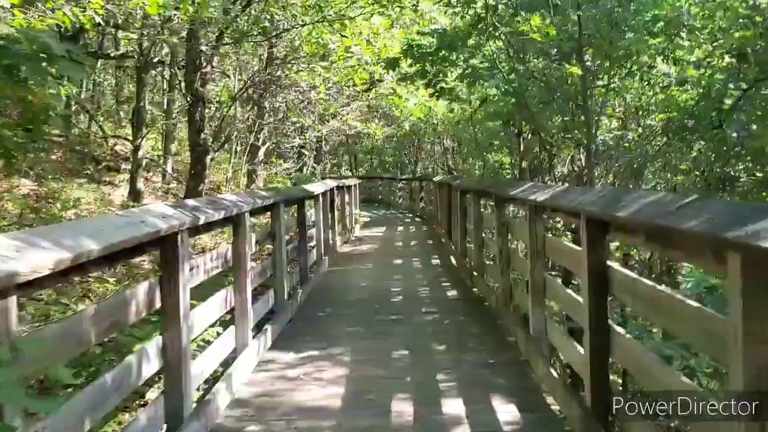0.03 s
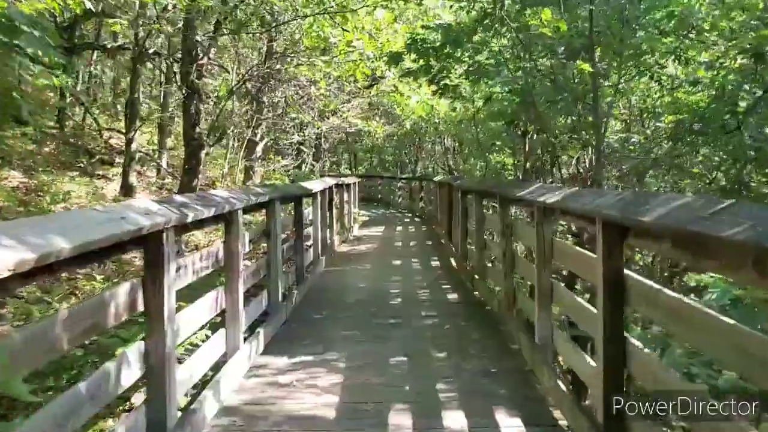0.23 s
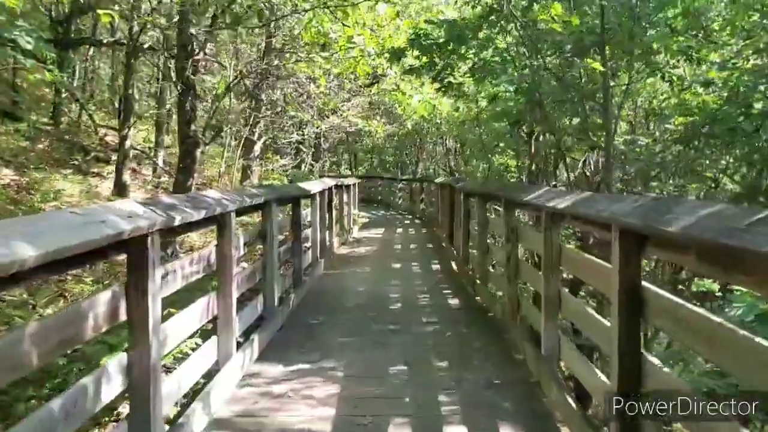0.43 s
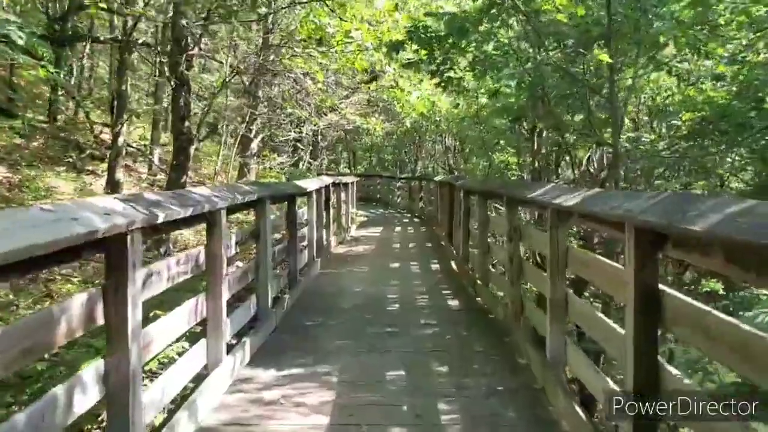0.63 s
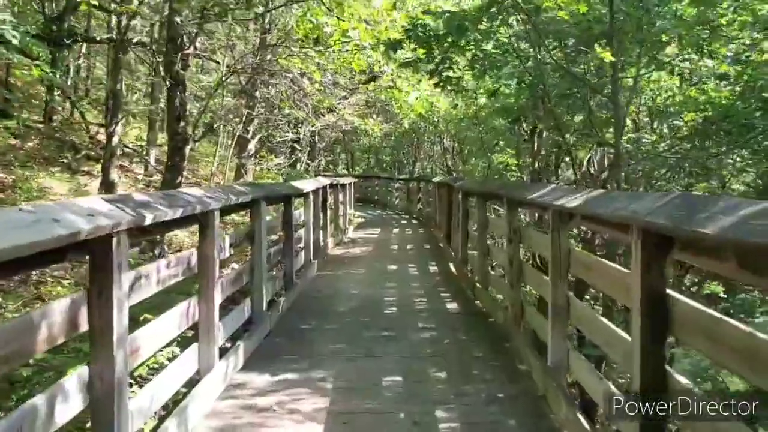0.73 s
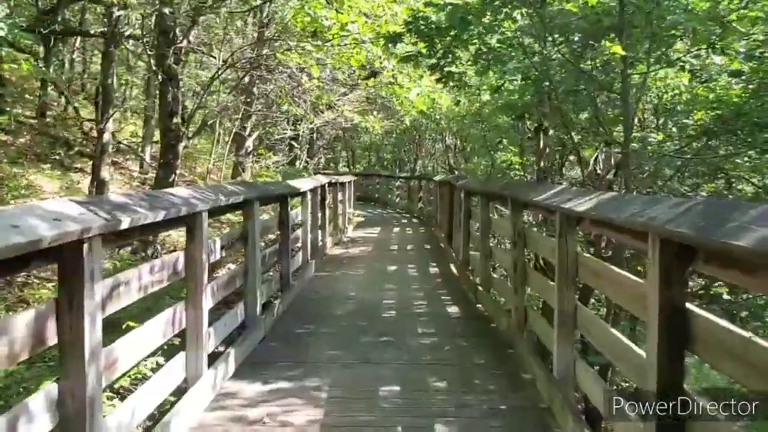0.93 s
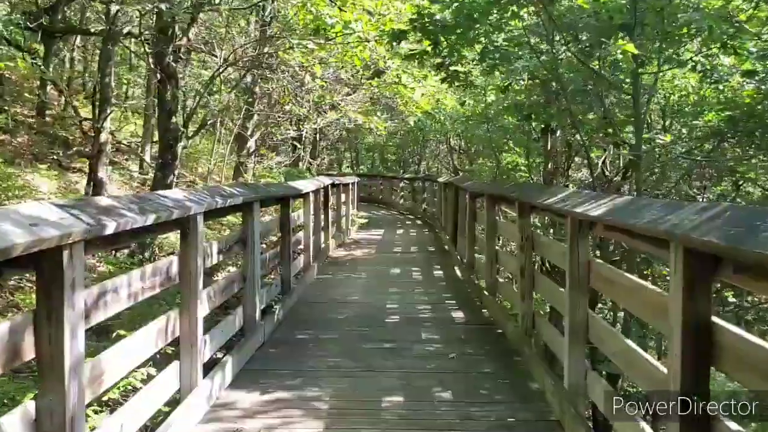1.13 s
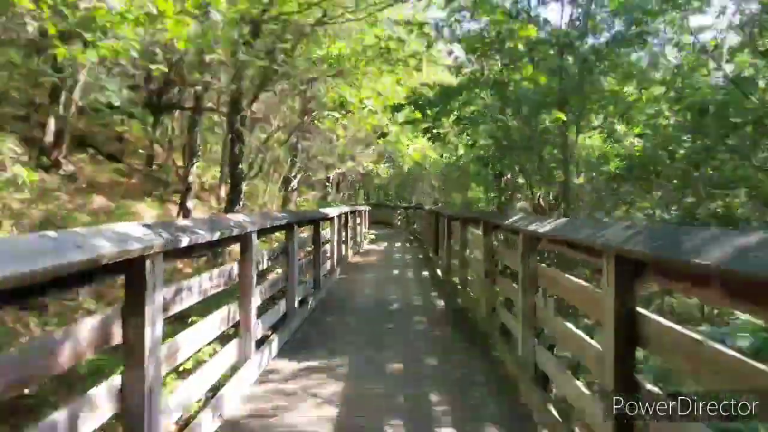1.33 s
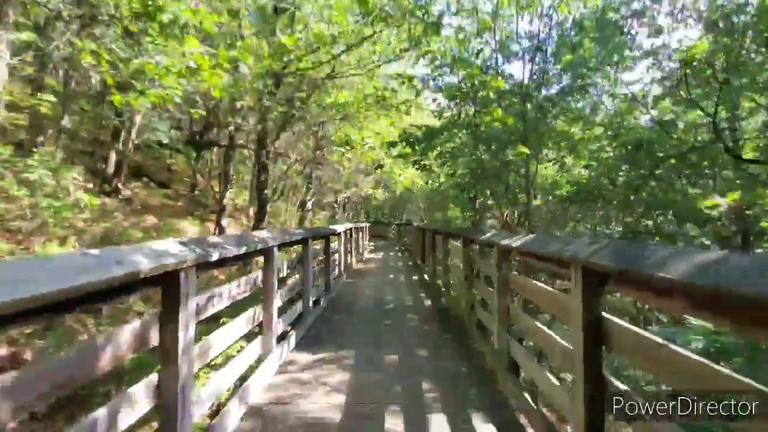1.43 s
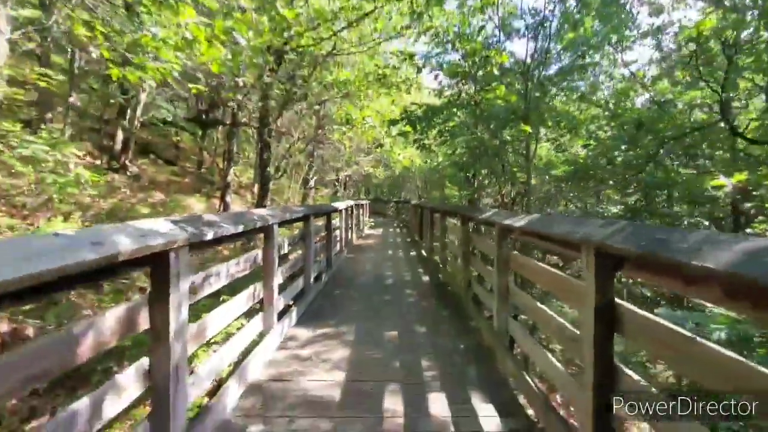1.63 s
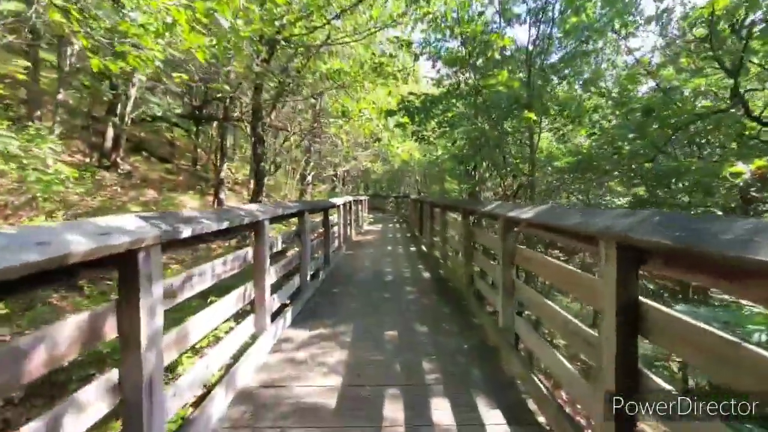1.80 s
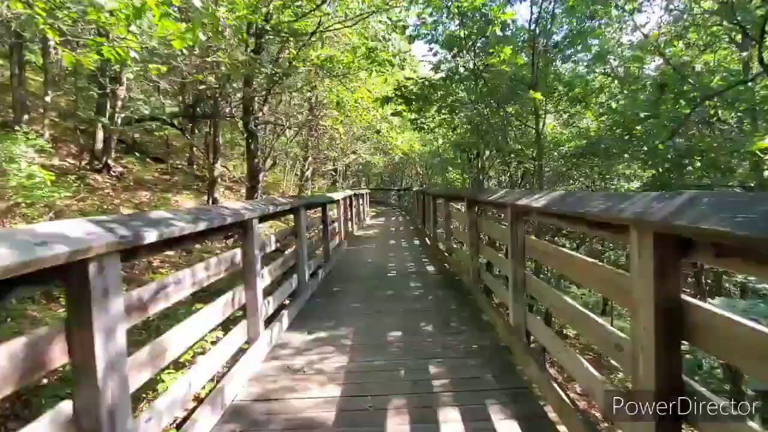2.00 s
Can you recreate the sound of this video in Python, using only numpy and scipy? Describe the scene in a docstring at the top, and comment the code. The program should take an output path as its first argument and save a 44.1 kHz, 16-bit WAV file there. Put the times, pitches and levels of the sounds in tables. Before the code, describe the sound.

Footsteps on a wooden boardwalk fade in over a low rumble and soft woodland hiss. Quiet hollow knocks with gritty scuffs come at about 0.4 and 0.8 seconds. Firmer steps follow at 1.4 seconds, at 1.6 seconds, the loudest, and at 2 seconds. A bird sings a faint sliding note around 0.7 seconds, then two more between 1.3 and 1.7 seconds, echoing slightly among the trees.

```python
"""Footsteps on a woodland boardwalk

Someone walks along wooden planks, holding a phone. Heels knock the boards and make them ring,
and soles scuff over grit. A bird sings three sliding notes that echo among the trees.
Behind it all are a low rumble, a high hiss and faint far-off whistles. The sound fades in."""
import sys
import numpy as np
from scipy import signal
from scipy.io import wavfile
from scipy.ndimage import uniform_filter1d

SR = 44100
rng = np.random.default_rng(int(sys.argv[2]) if len(sys.argv) > 2 else 0)


def store_wav(level_fs):
    """Save 16-bit WAV to argv[1]."""
    pcm = np.round(np.clip(np.atleast_2d(level_fs), -1, 1) * 32767)
    wavfile.write(sys.argv[1], SR, pcm.T.astype(np.int16))


N = 90934


def amp(db):
    return 10 ** (np.asarray(db) / 20)


def unit_level(x):
    return x / np.sqrt(np.mean(x ** 2) + 1e-20)


def wobble(length, smoothing):
    return unit_level(uniform_filter1d(rng.standard_normal(length), smoothing))


def curve_at(points, hz):
    point_hz, values = np.transpose(points)
    return np.interp(np.log(hz + 1), np.log(point_hz + 1), values)


def add(mix, start_s, sound):
    part = mix[..., round(start_s * SR):][..., :sound.shape[-1]]
    part += sound[..., :part.shape[-1]]


def delay_right(x, lag_s):
    """Make a stereo pair whose right side arrives a little later."""
    samples = np.arange(len(x))
    return np.array([x, np.interp(samples - lag_s * SR, samples, x, left=0)])


def narrow_noise(hz, width_hz, length):
    band = signal.butter(2, [hz - width_hz / 2, hz + width_hz / 2], "band", fs=SR)
    return unit_level(signal.lfilter(*band, rng.standard_normal(length)))


def stereo_noise(spectrum, likeness, size, length, boost_db=0, left_db=0, left_phase=0):
    """Two partly alike channels of noise. The spectrum sets the tone, not the loudness."""
    frames, hz = 4 * length // size + 5, np.fft.rfftfreq(size, 1 / SR)
    a, b, c, d = rng.standard_normal((frames, len(hz), 4)).T
    left = a + 1j * b
    right = likeness * left + np.sqrt(1 - likeness ** 2) * (c + 1j * d)
    pair = np.array([left * amp(left_db / 2) * np.exp(1j * left_phase), right / amp(left_db / 2)])
    pair *= amp(curve_at(spectrum, hz)[:, None] + boost_db)
    noise = signal.istft(pair, nperseg=size, noverlap=3 * size // 4)[1][:, :length]
    return noise / np.sqrt(np.mean(noise.mean(0) ** 2))


# The tone of the background hiss: pitch_hz, level_db
HISS_TONE = [(53, -46), (90, -1), (130, -15), (219, -5.5), (368, -17.5), (521, -12.5), (1140, -20),
             (1290, -26), (1680, -26), (1950, -30.5), (3150, -31), (4260, -36.5), (9930, -38.5),
             (13700, -25.5), (16000, -36.5)]
# How alike its left and right sides are: pitch_hz, likeness (0 to 1)
HISS_LIKENESS = [(60, 0.65), (130, 0.87), (300, 1), (500, 0.72), (800, 1), (1300, 0.12), (2500, 0.13),
                 (15000, 0.065)]
# How its treble rises and falls: time_s, boost_db
HISS_TREBLE = [(0, -0.3), (.35, 2), (.7, -1), (1.05, 0.6), (1.3, 1.5), (1.55, 3), (1.72, 2.5), (1.85, -1),
               (1.95, -0.5), (2.06, 6)]


def woodland_hiss():
    """The distant wash and high hiss of the wood, with drifting patches and a slow swell."""
    frames, hz = 4 * N // 1024 + 5, np.fft.rfftfreq(1024, 1 / SR)[:, None]
    speckles = rng.standard_normal((frames, len(hz))).T
    patches_db = unit_level(uniform_filter1d(uniform_filter1d(speckles, 12, axis=0), 12, axis=1))
    swell_db = .4 * wobble(frames, 20)
    edges_db = 40 * np.log10(np.minimum(hz / 90, 1) + 1e-4) - 45 * (hz > 15800)  # trim both ends
    treble_share = np.clip(np.log2(hz / 1500 + 1e-3), 0, 1)
    treble_db = treble_share * np.interp(np.arange(frames) * 256 / SR, *np.transpose(HISS_TREBLE))
    boost_db = patches_db + swell_db + edges_db + treble_db
    left_lag_s = .000293
    return amp(-46.5) * stereo_noise(HISS_TONE, curve_at(HISS_LIKENESS, hz), size=1024, length=N,
                                     boost_db=boost_db, left_phase=-2 * np.pi * hz * left_lag_s)


# The tone of the rumble: pitch_hz, level_db
RUMBLE_TONE = [(12, -64), (20, -8.5), (43, 13), (70, 9), (91, 6), (110, -28), (140, -27), (240, -120)]
# How the rumble rises and falls: time_s, level_db
RUMBLE_LOUDNESS = [(0, -40), (0.301, -46), (.6, -49.5), (.9, -41), (1.148, -52), (1.2, -42.5), (1.33, -42),
                   (1.5, -49), (1.75, -47.5), (1.86, -45), (2.06, -50.5)]


def rumble():
    """A lumpy, distant rumble, mostly below 100 Hz."""
    spectrum = [(5, -40), *RUMBLE_TONE, (200, -50), (20000, -120)]
    level_db = np.interp(np.arange(N) / SR, *np.transpose(RUMBLE_LOUDNESS))
    return amp(level_db) * stereo_noise(spectrum, likeness=.64, size=8192, length=N, left_db=-3)


# Faint whistles far away: start_s, length_s, pitch_hz, width_hz, level_db
FAR_WHISTLES = [(0, 0.07, 1710, 199, -49), (.14, 0.065, 3400, 600, -58.5), (.46, 0.19, 4560, 856, -57),
                (1.81, 0.097, 1640, 200, -55.5), (1.92, 0.15, 1737, 119, -56)]


def far_whistle(length_s, pitch_hz, width_hz, level_db):
    """A fuzzy whistle of narrow noise swells and dies away, unrelated on left and right."""
    length = round(length_s * SR)
    sides = np.array([narrow_noise(pitch_hz, width_hz, length) for _ in range(2)])
    return amp(level_db) * np.sqrt(np.hanning(length)) * sides


# A plank's tones, which each knock shifts: pitch_hz, level_db, ring_s (time to fall 60 dB)
PLANK_TONES = [(275, 0, 0.048), (353, -6.5, 0.068), (412.7, -5, 0.079), (643, -8.5, 0.033),
               (1011, -5, 0.038), (1200, -4, 0.012), (1550, -21.5, 0.06)]
# Heels landing: start_s, level_db, pitch_factor, hardness_db_per_octave, thump_db, press_s
HEEL_KNOCKS = [(.308, -40.5, 1.5, 1.5, -43, .002), (.440, -39.5, 0.98, 3.5, -62, 0.0026),
               (.50, -51, .9, -3, -34.5, 0.0067), (0.745, -35, 1.35, 0.5, -33, 0.0034),
               (.825, -45, 0.89, 2, -33, 0.0063), (1.095, -50, 1.14, -14, -36, 0.0014),
               (1.389, -35, 1.4, -4.5, -26, 0.0018), (1.4945, -45, 1.1, 4, -52, 0.0016),
               (1.611, -20, 0.996, 0.1, -39, 0.0037), (1.9925, -32.5, 1.356, -0.5, -27.5, 0.0024)]


def heel_knock(level_db, pitch_factor, hardness, thump_db, press_s):
    """A heel presses a plank for a moment. The plank rings and the beam under it thumps."""
    beam_hz, beam_ring_s = 101.3, .084
    t = np.arange(0, .2, 1 / SR)
    plank = np.zeros(len(t))
    for hz, tone_db, ring_s in PLANK_TONES:
        bright_db = hardness * np.log2(hz / PLANK_TONES[0][0])  # harder heels sound brighter
        tone = np.sin(2 * np.pi * (hz * pitch_factor * t + rng.random()))
        plank += amp(tone_db + bright_db - 60 * t / ring_s) * tone
    thump = amp(thump_db - 60 * t / beam_ring_s) * np.cos(2 * np.pi * beam_hz * t)
    press = np.minimum(t / press_s, 1) ** 2
    return delay_right(press * (amp(level_db) * plank - thump), lag_s=.00015)


# The tone of dragged grit: pitch_hz, level_db
GRIT_TONE = [(200, -48), (600, -14), (1000, -12), (1600, -10.5), (2900, -5), (6000, -8.5), (8500, -5.5),
             (10000, -5.5), (13900, -1.5), (15500, -9.5), (15750, -37), (16500, -30)]
# Soles scraping: start_s, level_db, rise_s, hold_s, ring_db, treble_left_db, tail_db,
# brightness_db_per_octave
SOLE_SCUFFS = [(0.441, -40, 0.00056, 0.0067, 0.5, 7.5, -5.5, -1),
               (.745, -47.5, 0.0017, 0.06, -8, -1.5, -3, -1), (.80, -54.5, 0.012, 0.13, -6, -2, -12, -3.5),
               (.886, -40.5, 0.0045, 0.01, -5, 13.5, -10.5, 0),
               (1.1818, -38, 0.00081, 0.0056, -16, 20.5, -7.5, -2.5),
               (1.48, -62, 0.0081, 0.014, -2, -3, 3, -3), (1.613, -42, 0.0046, 0.012, -27, 9, -12, -1.5),
               (1.633, -44, 0.0033, 0.0081, -7, 4, -6.5, -0.5),
               (1.696, -57.5, 0.0018, 0.0046, -6, 1, 3, -3.5),
               (1.963, -65, 0.0025, 0.0092, -2.5, 11, 0.5, -2)]


def sole_scuff(level_db, rise_s, hold_s, ring_db, treble_left_db, tail_db, brightness):
    """A sole drags grit: a grainy hiss and a high ring, then a fainter tail."""
    fall_s, tail_s, grain_s = .0022, .035, .00048
    length = SR // 5
    t = np.arange(length) / SR
    after_hold = np.maximum(t - hold_s, 0)
    dying = np.exp(-after_hold / fall_s) + amp(tail_db) * np.exp(-after_hold / tail_s)
    loudness = amp(level_db) * np.minimum(t / rise_s, 1) * dying
    grains = amp(1.5 * wobble(length, round(grain_s * SR)))
    hz = np.fft.rfftfreq(256, 1 / SR)[:, None]
    left_db = curve_at([(4900, 0), (8500, treble_left_db)], hz)
    hiss = stereo_noise(GRIT_TONE, likeness=.37, size=256, length=length,
                        boost_db=brightness * np.log2(hz + 1), left_db=left_db)
    ring = delay_right(narrow_noise(hz=3100, width_hz=450, length=length), lag_s=.00011)
    return loudness * (unit_level(grains) * unit_level(hiss) + amp(ring_db) * ring)


# The bird's three notes, each a list of points to slide through: time_s, pitch_hz, level_db
BIRD_NOTES = [
    [(.652, 2683, -76), (.675, 2690, -47.5), (.7, 2634, -62), (.72, 2714, -50.5), (.745, 3200, -60),
     (.77, 3800, -50), (.79, 4080, -58), (.825, 3270, -66)],
    [(1.333, 2695, -65), (1.35, 3500, -46), (1.372, 4420, -54), (1.388, 3800, -58), (1.4, 3200, -48),
     (1.413, 2780, -50.5), (1.428, 3455, -49.5), (1.445, 3050, -56), (1.47, 2695, -51.5)],
    [(1.522, 2968, -71), (1.535, 3018, -43.5), (1.55, 3800, -52), (1.572, 4520, -54.5), (1.587, 3300, -53),
     (1.602, 2788, -47), (1.622, 3146, -50.5), (1.64, 3100, -51), (1.67, 2660, -59)],
]


def bird():
    """A bird's sliding whistles arrive directly, then again as echoes scattered by the trees."""
    flutter_db, right_db, echo_db, echo_s = 3.5, 1.5, -2.5, .32
    song = np.zeros(N)
    for note in BIRD_NOTES:
        times, hz, db = np.transpose(note)
        t = np.arange(times[0], times[-1], 1 / SR)
        pitch = uniform_filter1d(np.interp(t, times, hz), size=300)
        soft_ends = np.minimum(np.minimum(t - times[0], times[-1] - t) / .0017, 1)
        loudness = amp(np.interp(t, times, db) + flutter_db * wobble(len(t), 150))
        tone = np.sqrt(2) * np.sin(2 * np.pi * np.cumsum(pitch) / SR)
        add(song, times[0], soft_ends * loudness * tone)
    t = np.arange(SR // 2) / SR
    bounces = rng.standard_normal((len(t), 2)).T * amp(-60 * t / echo_s) * (t > .008)
    echo = signal.fftconvolve(song[None], bounces / np.linalg.norm(bounces[0]), axes=1)[:, :N]
    direct = delay_right(song, lag_s=.0001) * amp([[-right_db / 2], [right_db / 2]])
    return direct + amp(echo_db) * echo


def scene():
    """Mix the bird and the background, then place each whistle, knock and scuff."""
    mix = bird() + woodland_hiss() + rumble()
    for table, source in (FAR_WHISTLES, far_whistle), (HEEL_KNOCKS, heel_knock), (SOLE_SCUFFS, sole_scuff):
        for start_s, *settings in table:
            add(mix, start_s, source(*settings))
    return mix


# How the phone's right microphone opening dulls the treble: pitch_hz, gain_db
RIGHT_MIC_TONE = [(4500, 0.4), (7500, -1), (8400, -4), (9600, -15), (10500, 0), (11500, -14.5),
                  (13000, -1.5), (15500, -28)]


def record(dry):
    """Fade the sound in, dull the right side and cut off the very highest treble."""
    fade_s, top_hz = 1.52, 16450
    left, right = dry * np.interp(np.arange(N) / SR, [0, fade_s], [.1, 1])
    hz = np.linspace(0, SR / 2, 257)
    dulling = signal.firwin2(255, hz, amp(curve_at(RIGHT_MIC_TONE, hz)) * (hz < SR / 2), fs=SR)
    mics = np.array([left, signal.oaconvolve(right, dulling, "same")])
    treble_cut = signal.firwin(511, top_hz, window=("kaiser", 9), fs=SR)
    return signal.oaconvolve(mics, treble_cut[None], "same")


dry = scene()
out = record(dry)
store_wav(out)
```